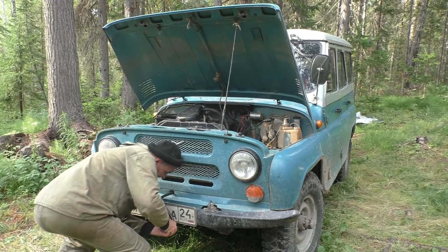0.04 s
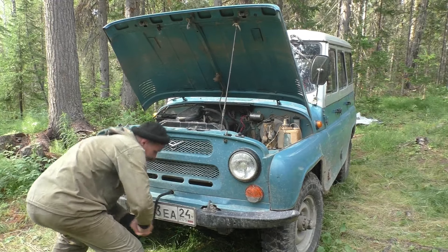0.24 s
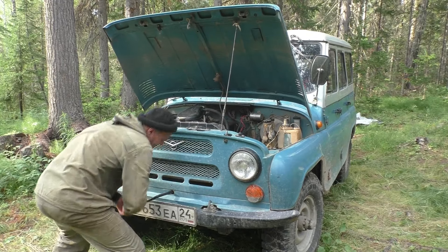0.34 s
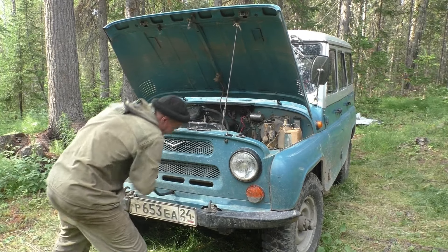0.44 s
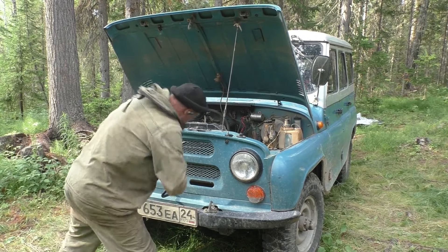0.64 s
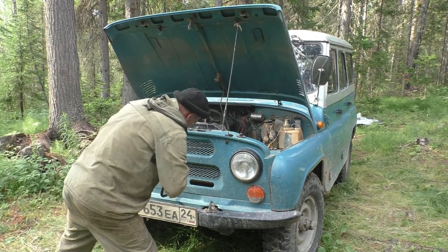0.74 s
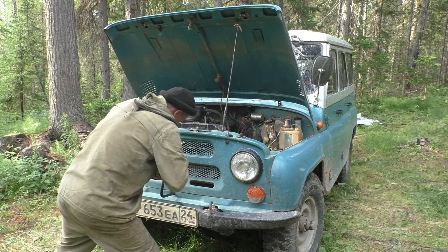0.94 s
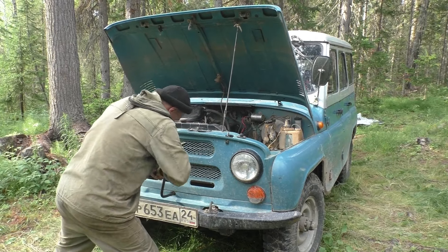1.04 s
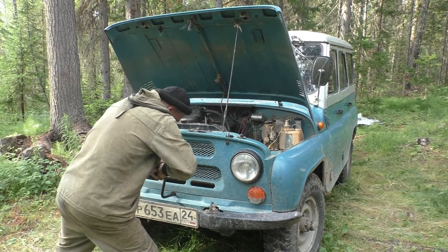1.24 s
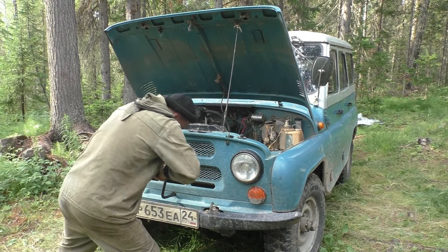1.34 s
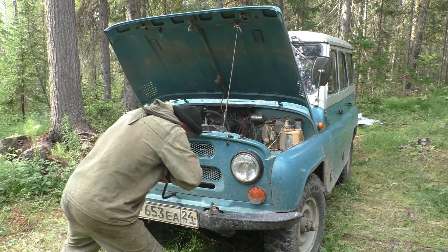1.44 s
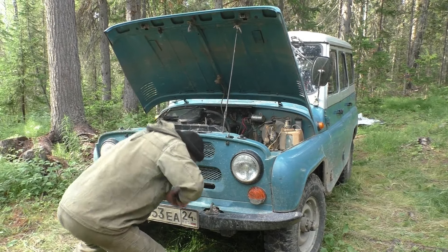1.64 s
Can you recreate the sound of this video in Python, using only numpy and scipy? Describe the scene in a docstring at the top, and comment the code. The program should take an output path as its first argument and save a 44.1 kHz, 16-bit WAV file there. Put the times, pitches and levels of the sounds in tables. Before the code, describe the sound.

A steel starting crank clanks sharply three times as it is pushed into a vehicle, squealing briefly while the bodywork booms, then scrapes home. A faint echo fades into quiet forest, with distant birds and a soft cloth rustle.

```python
"""A steel clank breaks the hush of a forest: a starting crank is pushed into an off-road vehicle.
The crank rings each time it is struck, three times in all, and the bodywork booms along.
It squeals as it sticks and slips in its guide, then scrapes home. The trees return a faint echo.
A boot shifts softly, small birds chirp far away and cloth rustles near the end."""
import sys
import numpy as np
from scipy import signal
from scipy.fft import rfft, irfft
from scipy.io import wavfile
from scipy.ndimage import uniform_filter1d, minimum_filter1d

SR = 44100
rng = np.random.default_rng(int(sys.argv[2]) if len(sys.argv) > 2 else 0)


def wrap_up_sound(samples):
    """Save the sound to the file named by the first command line argument, as 16-bit audio."""
    columns = np.atleast_2d(samples).T
    # keep every value between -1 and 1, then stretch to whole-number steps
    tamed = np.clip(columns, -1, 1)
    steps = np.round(tamed * 32767).astype(np.int16)
    wavfile.write(sys.argv[1], SR, steps)


N = 74970
T = np.arange(N) / SR
FREQS = np.maximum(np.fft.rfftfreq(N, 1 / SR), 1)
BAND_CENTRES_HZ = 62.5 * 2 ** (np.arange(17) / 2)

# A "fade" (t60 in the code) is the time a sound takes to drop by 60 dB.
# The three blows: (time [s], ring strength [dB], clatter strength [dB], rattle length [s])
CLANKS = [(.2175, 2, -3.5, 0.0071), (.4825, 4, 2, .006), (.5868, 6, 4, 0.0081)]
# Tones of the crank and guide, struck at a new spot each time; ring strength is added:
# (pitch [Hz], fade [s], level in clank 1 [dB], in clank 2 [dB], in clank 3 [dB])
CRANK_TONES = [(509, 0.34, -35, -34.5, -33), (620.2, 0.22, -33, -46, -37), (985, .15, -31, -28, -28),
               (1038, 0.16, -27, -28, -21), (1146.5, 0.18, -19.5, -32, -39), (1182, 0.29, -30, -45, -25),
               (1455, 0.16, -25, -19, -28.5), (1716.5, 0.093, -25.5, -39, -20.5),
               (1824, 0.0537, -32, -11.5, -19), (1920, 0.072, -40, -18, -25.5), (2090, 0.14, -29, -37, -26),
               (2250, 0.095, -28, -50, -30), (2682, 0.15, -27.5, -25, -20.5), (2790, 0.12, -19.5, -30, -21),
               (3025, 0.2, -35, -35, -26.5), (3518, 0.088, -38, -58, -24), (4203, 0.097, -34.5, -27, -32.5)]
# Dense ring of the sheet metal, per third octave; clatter strength is added:
# (frequency [Hz], fade [s], level in clank 1 [dB], in clank 2 [dB], in clank 3 [dB])
SHEET_CLATTER = [(80, 0.36, -82, -77, -78), (123, 0.53, -75, -56, -69), (192.6, 0.53, -37.5, -49, -43.5),
                 (436, 0.52, -42, -32.5, -49), (734, 0.086, -37, -49, -45.5), (1100, 0.14, -28, -28, -26.5),
                 (2200, 0.16, -27.5, -41, -28), (2950, 0.17, -29, -29, -23),
                 (4040, 0.13, -34.5, -39, -31.5), (6100, .12, -46.5, -50, -36.5),
                 (10700, .11, -49.5, -46.5, -38), (15400, 0.077, -66, -59, -43.5)]
# The steel binds and sings:
# (time [s], pitch [Hz], level [dB], octave level [dB], level where the higher overtones start [dB])
BINDING_SQUEAL = [(.222, 2845, -26.5, -58, -71), (.243, 2870, -26, -44.5, -56), (.265, 2843, -27, -50, -62),
                  (.274, 2849, -27, -43.5, -47.5), (.292, 2845, -21, -35.5, -47.5),
                  (.307, 2845, -21, -33.5, -50), (.314, 2834, -12.5, -44, -49),
                  (.330, 2846, -24, -46.5, -59), (.339, 2820, -48.5, -66, -71),
                  (.352, 2830, -30.5, -64, -70), (.367, 2850, -41, -76, -74), (.39, 2800, -54, -72, -70)]
# The second clank skids on two rough tones, a higher and a lower one (same columns)
HIGH_SKID = [(.485, 2790, -21, -54, -64), (.489, 2794, -11.5, -40, -47), (.502, 2723, -17, -37, -62),
             (.507, 2700, -24, -45, -50), (.512, 2772, -9.5, -46, -57), (.517, 2740, -26, -58, -50),
             (.524, 2770, -15, -46, -57), (.534, 2700, -30, -55, -62)]
LOW_SKID = [(.495, 2600, -31, -36, -55), (.505, 2537, -20, -25.5, -30.5), (.512, 2560, -29, -29.5, -38.5),
            (.521, 2550, -35, -52, -40), (.535, 2650, -48, -58, -60)]
# Knocks that reach the bodywork: (time [s], strength [dB])
BODY_KNOCKS = [(.219, -16), (.487, 0.5), (.549, 7)]
# Tones of the bodywork; knock strength is added: (pitch [Hz], level [dB], fade [s])
BODY_TONES = [(82, -50, 1.7), (173, -62, 0.64), (212.8, -36.5, 0.28), (221.4, -34, 0.29),
              (299, -42.5, 0.87), (456, -39, 0.88), (508, -47.5, 0.88), (901, -43.5, 1.4)]
# The crank slides: (peak time [s], rise [s], fade [s], strength [dB])
SLIDES = [(0.218, 0.019, 0.041, -44), (.46, 0.02, .15, -65), (0.586, 0.078, 0.53, -29.5),
          (0.785, 0.039, .55, -39.5), (1.025, 0.033, 0.35, -55)]
# Tone colour of a slide and of its gritty part: (frequency [Hz], relative third-octave level [dB])
SLIDE_COLOUR = [(40, -33), (80, -24.5), (125, -18.5), (200, -13), (450, -9), (750, -14.5), (1100, -2),
                (1700, -3.5), (2300, -13), (2900, -9), (4200, -21), (8000, -36), (15000, -40)]
GRIT_COLOUR = [(300, -48), (1500, -3.5), (2600, 8.5), (3700, -7), (5000, -0.5), (6300, -14.5),
               (7700, -10.5), (10000, -10.5), (15000, -21)]
# Echo among the trees: (frequency [Hz], gain [dB], fade [s])
FOREST_ECHO = [(100, -8.5, 3.9), (304, -10.5, 2.36), (1200, -18.5, 1.1), (2770, -22.5, 0.73),
               (8060, -16, 0.41)]
# Far birds: (time [s], length [s], start pitch [Hz], end pitch [Hz], level [dB])
BIRD_CHIRPS = [(1.315, 0.059, 5700, 4633, -58), (1.45, .055, 5500, 4910, -58),
               (1.61, 0.062, 4300, 4340, -49.5), (1.663, .03, 3950, 4180, -54),
               (1.664, .035, 7600, 7200, -63)]
# A boot on soft ground: (time [s], pitch [Hz], fade [s], level [dB])
BOOT_THUD = (.405, 36, 1.1, -53)
# Hush of the woods: (frequency [Hz], third-octave level [dB])
HUSH_COLOUR = [(25, -86), (50, -73), (90, -77), (140, -68), (215, -58.5), (320, -60), (480, -59.5),
               (750, -62.5), (1100, -56.5), (1700, -58.5), (2400, -63.5), (4000, -65.5), (8000, -69),
               (15000, -66)]
# How much noise differs between the ears: (frequency [Hz], side level minus middle level [dB])
STEREO_WIDTH = [(30, -5), (80, -3), (160, -16.5), (1000, -16.5), (3000, -6.5), (12000, -22.5)]

ATTACK_S = 0.0021
EAR_SPLIT = np.array([[.5], [-.5]])   # half to the left ear, the opposite half to the right


def clanks():
    """Each blow makes the crank ring and sets the sheet metal around it chattering."""
    out, flutter, bands = np.zeros((2, N)), chatter(), noise_bands()
    for k, (start, ring_db, clatter_db, hold) in enumerate(CLANKS):
        for hz, t60, *levels_db in CRANK_TONES:
            add(out, start, struck_tone(hz, ring_db + levels_db[k], t60))
        first = int(start * SR)
        for hz, band in bands:
            gain = from_db(clatter_db + at_hz(SHEET_CLATTER, hz, k + 2))
            envelope = gain * fade_out(at_hz(SHEET_CLATTER, hz), hold)[:N - first]
            span = slice(first, first + len(envelope))
            add(out, start, envelope * flutter[span] * band[:, span])
    return out


def rebounds(hits_per_s=520, db=-19, t60=0.093, low_cut_hz=3500):
    """The crank bounces in a dying spray of tiny clicks, stronger when its clatter is bright."""
    out = np.zeros((2, N))
    treble_db = SHEET_CLATTER[-2][2:]
    for k, (start, _, clatter_db, hold) in enumerate(CLANKS):
        envelope = fade_out(t60, hold)
        clicks = (rng.random(N) < hits_per_s / SR) * rng.normal(size=N)
        gain = from_db(db + clatter_db + treble_db[k] - max(treble_db))
        add(out, start, gain * envelope * clicks[:len(envelope)] * pan(0))
    low_cut = signal.butter(2, low_cut_hz, "high", fs=SR, output="sos")
    return signal.sosfilt(low_cut, out + 1e-18)


def squeal(rows, jitter, overtone_drop_db):
    """Steel sticks and slips at one ringing tone; its pitch shakes by the fraction `jitter`."""
    times, *columns = np.transpose(rows)
    out, t = np.zeros((2, N)), T[int(times[0] * SR):int(times[-1] * SR)]
    hz, db, octave_db, upper_db = [np.interp(t, times, column) for column in columns]
    shaky_hz = hz * (1 + jitter * drift(rate_hz=260)[:len(t)])
    phase = 2 * np.pi * np.cumsum(shaky_hz) / SR
    main = from_db(db) * np.sin(phase + 0.18 * EAR_SPLIT)
    octave = from_db(octave_db) * np.sin(2 * phase)
    upper = sum(from_db(upper_db - overtone_drop_db * k) * np.sin((k + 3) * phase) for k in range(3))
    gate = np.clip(np.minimum(t - times[0], times[-1] - t) / ATTACK_S, 0, 1)
    add(out, times[0], np.sqrt(2) * gate * (main + octave + upper) * pan(db=1))
    return out


def bodywork():
    """The bumper and panels boom after each knock."""
    out = np.zeros((2, N))
    for start, knock_db in BODY_KNOCKS:
        for hz, db, t60 in BODY_TONES:
            add(out, start, struck_tone(hz, knock_db + db, t60))
    return out


def scrapes(ring_width_hz=21):
    """The shaft rubs along its guide, gritty where it binds; rubbing rings the crank's upper tones."""
    grit = swell(peak=.506, rise=0.022, t60=0.23, db=-32) * shaped_noise(GRIT_COLOUR) * chatter()
    rubbing = sum(swell(*slide) for slide in SLIDES) * shaped_noise(SLIDE_COLOUR)
    peaks = sum(1 / (1 + 2j * (FREQS - hz) / ring_width_hz) for hz, *_ in CRANK_TONES[2:])
    boost = from_db(0.25) + from_db(-0.25) * peaks
    return irfft(rfft(rubbing) * boost, N) + grit


def forest_echo(sound, delay_s=.02):
    """Tree trunks scatter the sound into a thin echo whose low notes last longest."""
    echo = np.zeros((2, N))
    for hz, band in noise_bands():
        tail = fade_out(at_hz(FOREST_ECHO, hz, 2))
        share = hz * np.log(2) / 3 / (SR / 2)   # a third octave's part of all frequencies
        gain = from_db(at_hz(FOREST_ECHO, hz)) * np.sqrt(share / np.sum(tail ** 2))
        add(echo, delay_s, gain * tail * band[:, :len(tail)])
    return signal.fftconvolve(sound.mean(axis=0)[None], echo, axes=1)[:, :N]


def birds():
    """Far birds sing thin, slightly wavering notes that glide in pitch."""
    out, waver = 0, 1 + 0.006 * drift(rate_hz=141)
    for start, length, start_hz, end_hz, db in BIRD_CHIRPS:
        progress = np.clip((T - start) / length, 0, 1)
        hz = (start_hz + (end_hz - start_hz) * progress) * waver
        envelope = from_db(db) * np.sin(np.pi * progress)
        out = out + envelope * np.sin(2 * np.pi * np.cumsum(hz) / SR)
    return out


def boot():
    """A boot shifts on the soft ground with a faint, deep thud."""
    out = np.zeros((2, N))
    start, hz, t60, db = BOOT_THUD
    add(out, start, struck_tone(hz, db, t60))
    return out


def cloth(centre_hz=3060):
    """Cloth rustles in one soft swell of hiss."""
    hiss = irfft(noise_spectrum() / (1 + 2 * np.log2(FREQS / centre_hz) ** 2), N)
    return swell(peak=1.59, rise=0.082, t60=1.2, db=-58) * hiss


def hush():
    """The air in the woods makes a steady, quiet noise."""
    return shaped_noise(HUSH_COLOUR)


def struck_tone(hz, db, t60):
    """One fading tone of a struck object, reaching the two ears a little differently."""
    envelope = from_db(db) * fade_out(t60)
    phase = 2 * np.pi * (hz * T[:len(envelope)] + rng.random())
    ear_shift = 0.083 * rng.normal() * EAR_SPLIT
    return envelope * np.sin(phase + ear_shift) * pan(-rng.normal())


def fade_out(t60, hold=0):
    """A loudness curve that jumps up, stays until `hold` seconds, then dies away."""
    age = T[:int((hold + 1.2 * t60) * SR) + 2]
    return np.minimum(age / ATTACK_S, 1) * np.exp(-np.log(1000) * np.maximum(age - hold, 0) / t60)


def swell(peak, rise, t60, db):
    """A loudness curve that grows softly until `peak` seconds, then dies away."""
    age = T - peak
    return from_db(db) * np.exp(np.where(age < 0, 2 * age / rise, -np.log(1000) * age / t60))


def chatter(depth_db=2.0):
    """The fast, random flutter in loudness of rattling metal."""
    return from_db(depth_db * drift(rate_hz=83))


def drift(rate_hz):
    """A smooth random wobble with a typical size of 1."""
    wobble = irfft(rfft(rng.standard_normal(N)) / (1 + (np.fft.rfftfreq(N, 1 / SR) / rate_hz) ** 2), N)
    return wobble / wobble.std()


def noise_spectrum():
    """The spectrum of nearly centred stereo pink noise, about equally strong in each third octave."""
    third_octave_hz = np.maximum(FREQS, 20) * np.log(2) / 3
    middle, side = rfft(rng.standard_normal((2, N))) * np.sqrt(SR / 2 / third_octave_hz)
    return middle + from_db(at_hz(STEREO_WIDTH, FREQS)) * side * np.array([[1], [-1]])


def shaped_noise(colour):
    """Steady noise with the tone colour given by a table."""
    return irfft(noise_spectrum() * from_db(at_hz(colour, FREQS)), N)


def noise_bands():
    """Noise cut into half-octave slices: (centre [Hz], sound)."""
    spectrum, nearest = noise_spectrum(), np.round(2 * np.log2(FREQS / BAND_CENTRES_HZ[0]))
    return [(hz, irfft(spectrum * (nearest == k), N)) for k, hz in enumerate(BAND_CENTRES_HZ)]


def from_db(db):
    """Turns decibels into a number to multiply by."""
    return 10 ** (np.asarray(db) / 20)


def at_hz(rows, hz, column=1):
    """Looks up a frequency in a table, blending between rows on an octave scale."""
    rows = np.array(rows)
    return np.interp(np.log(hz), np.log(rows[:, 0]), rows[:, column])


def pan(db):
    """Left and right gains that make the left ear `db` louder."""
    return from_db(db * EAR_SPLIT)


def add(out, start, sound):
    """Mixes a sound in at `start` seconds."""
    first = int(start * SR)
    out[:, first:first + sound.shape[1]] += sound[:, :N - first]


def scene():
    """The crank and the vehicle, with the woods around them."""
    squeals = (squeal(BINDING_SQUEAL, jitter=0.0016, overtone_drop_db=9)
               + squeal(HIGH_SKID, jitter=0.0084, overtone_drop_db=8.5)
               + squeal(LOW_SKID, jitter=.035, overtone_drop_db=8.5))
    metal = clanks() + rebounds() + bodywork() + scrapes()
    echo = forest_echo(metal + from_db(-7) * squeals)   # thin squeals carry less far among the trees
    return metal + squeals + echo + birds() + cloth() + hush() + boot()


def record(dry):
    """A limiter turns the loudest blows down and recovers slowly; the highest treble is cut."""
    limit_db, recovery_db_per_s, window_s, cutoff_hz = -6.5, 19.5, 0.0014, 16000
    window = int(window_s * SR) + 1
    level_db = 20 * np.log10(abs(dry).max(axis=0) + 1e-9)
    excess_db = -minimum_filter1d(np.minimum(limit_db - level_db, 0), window)
    recovery_db = recovery_db_per_s * T
    cut_db = np.maximum.accumulate(excess_db + recovery_db) - recovery_db
    limited = dry * from_db(-uniform_filter1d(cut_db, window))
    return signal.sosfilt(signal.ellip(10, .2, 70, cutoff_hz, fs=SR, output="sos"), limited)


dry = scene()
out = record(dry)
wrap_up_sound(out)
```